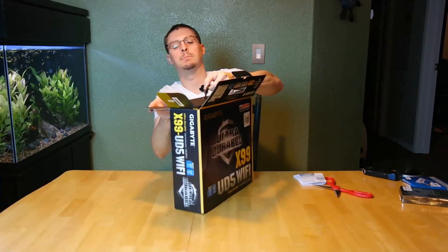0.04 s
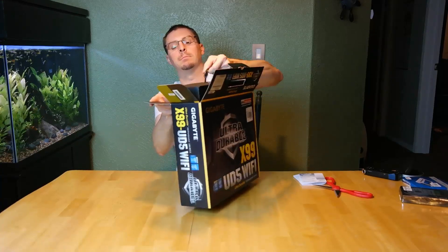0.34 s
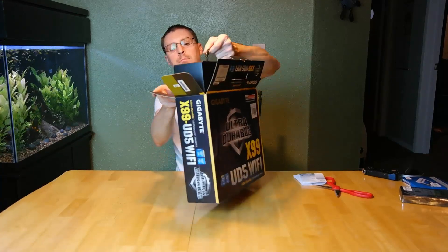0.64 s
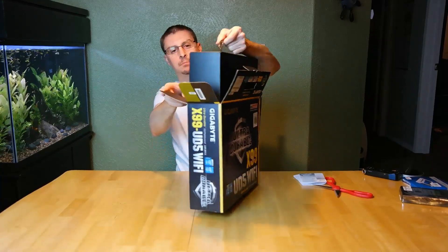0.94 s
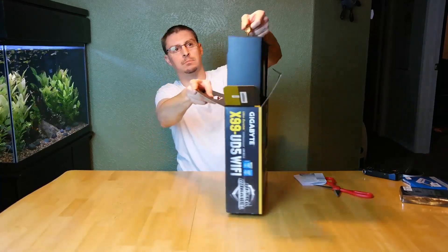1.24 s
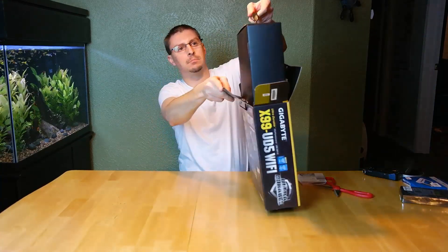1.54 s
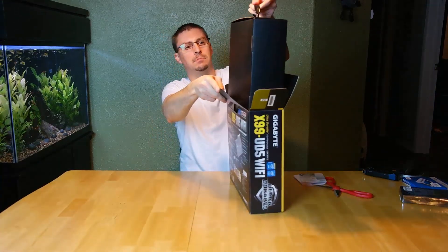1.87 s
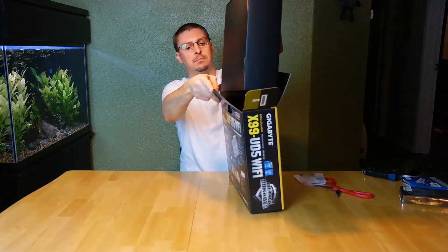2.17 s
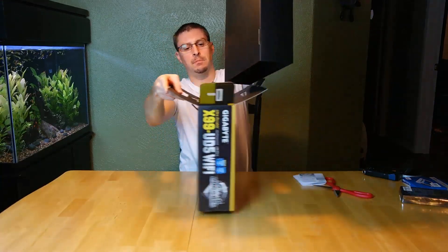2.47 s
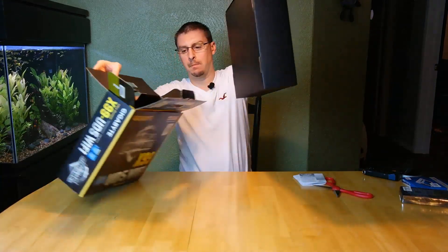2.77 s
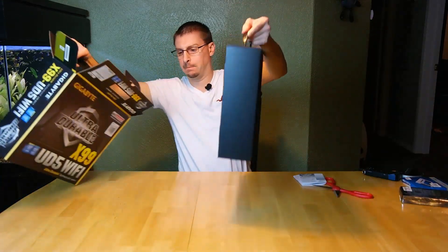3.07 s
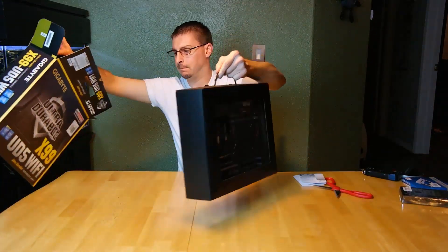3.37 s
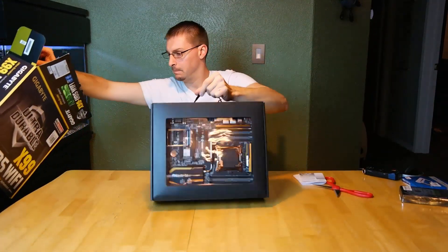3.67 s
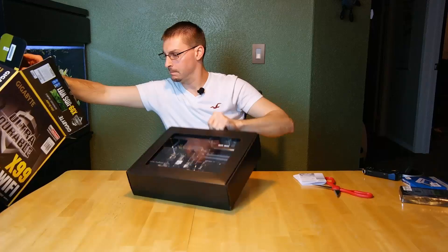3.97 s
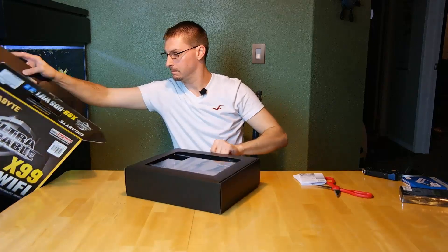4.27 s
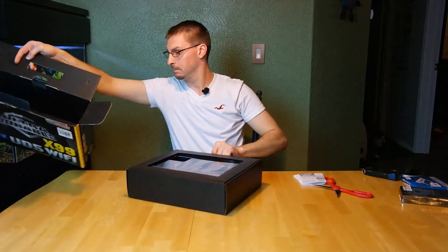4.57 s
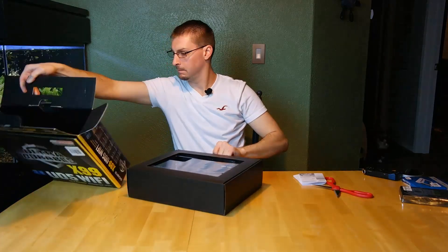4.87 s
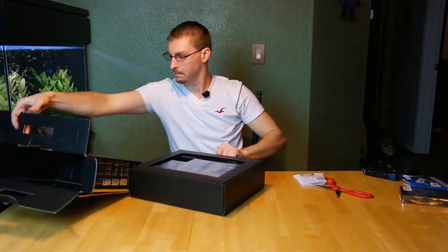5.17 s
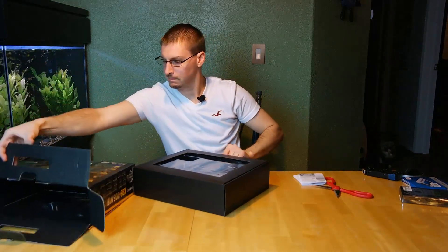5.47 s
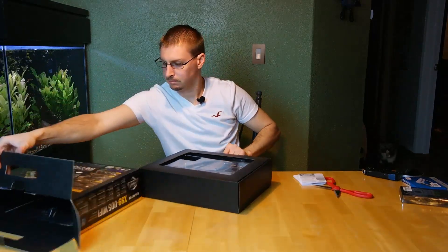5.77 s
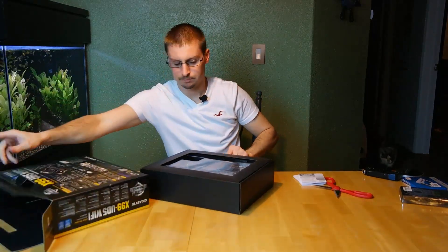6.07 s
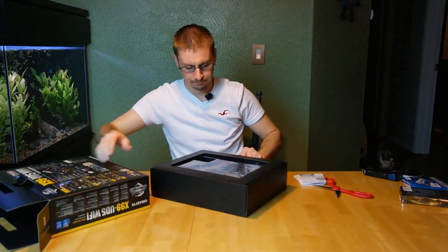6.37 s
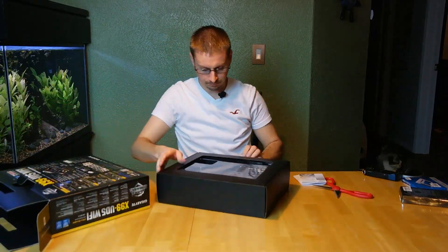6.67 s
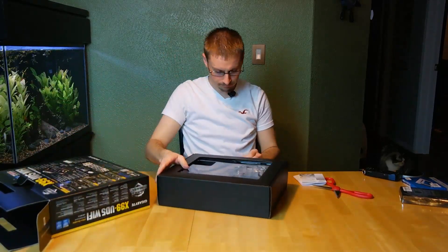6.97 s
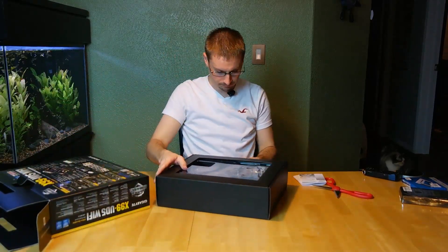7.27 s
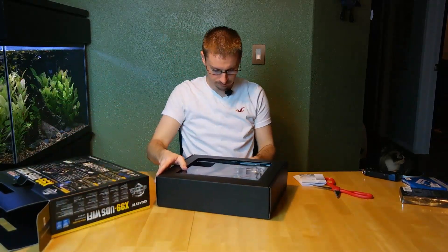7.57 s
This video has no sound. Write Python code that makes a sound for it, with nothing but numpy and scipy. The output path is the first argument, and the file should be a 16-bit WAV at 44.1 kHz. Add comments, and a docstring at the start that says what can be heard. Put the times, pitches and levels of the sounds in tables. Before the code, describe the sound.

Cardboard slides against cardboard with a dry, uneven hiss and a few hollow knocks as an inner box is pulled from its sleeve. A loud thud follows as the box meets a wooden tabletop, which booms briefly. Lighter knocks and scrapes come as the sleeve is dropped and pushed aside, ending with soft finger taps on the box. The sounds are fairly close, in a small room with a low pump hum.

```python
"""Unsleeving a heavy box.

In a small room, a heavy inner box rubs out of its cardboard sleeve in three pulls and is set down
on a wooden table, which booms. The empty sleeve is dropped beside it and pushed away; hands then
shift and tap the box. Slipping fibres hiss; blows ring the hollow, panels and paper surface.
An aquarium pump hums under the room's steady wash."""
import sys
import numpy as np
from scipy import signal
from scipy.io import wavfile

SR = 44100
rng = np.random.default_rng(int(sys.argv[2]) if len(sys.argv) > 2 else 0)


def to_wav(sig):
    """Store sig (one row per channel, or 1-D mono) as 16-bit WAV at the path in sys.argv[1].

    Samples outside -1..1 are clipped; the rate is SR.
    """
    pcm = np.clip(np.atleast_2d(sig), -1, 1) * 32767
    pcm = np.round(pcm).astype(np.int16)
    wavfile.write(sys.argv[1], SR, pcm.T)  # frames by channels


N = 344685


def amp(db):
    """Decibels to gain."""
    return 10 ** (np.asarray(db) / 20)


def unit(x):
    """Scale to rms 1."""
    return x / np.sqrt(np.mean(x ** 2) + 1e-20)


def unit_attack(x):
    """Scale to rms 1 over the first 15 ms."""
    return x / np.sqrt(np.mean(x[:660] ** 2) + 1e-20)


def log_interp(points, hz):
    """Interpolate on a log-frequency axis."""
    knots_hz, values = np.transpose(points)
    return np.interp(np.log(hz + 1), np.log(knots_hz + 1), values)


def add(mix, start_s, sound):
    """Mix a sound in at start_s."""
    part = mix[max(round(start_s * SR), 0):][:len(sound)]
    part += sound[:len(part)]


def colour(x, spectrum, size=4096):
    """Minimum-phase filter with the given spectrum."""
    bins_hz = abs(np.fft.fftfreq(size, 1 / SR))
    log_gain = np.log(amp(log_interp(spectrum, bins_hz)))
    response = np.exp(np.conj(signal.hilbert(log_gain)))
    impulse = np.fft.ifft(response).real[:size // 2]
    return signal.fftconvolve(x, impulse)[:len(x)]


def decay(t, t60_s):
    """Gain falling 60 dB in t60_s."""
    return np.exp(-np.log(1000) * t / t60_s)


def drift(count, hz):
    """Random curve of rms 1, hz knots a second."""
    knots = rng.standard_normal(int(N / SR * hz) + 3)
    return unit(np.interp(np.arange(count) / SR * hz, np.arange(len(knots)), knots))


def swell(peak_s, rise_s, fall_s, depth_db=16.5):
    """Start time and gain of a stroke: up depth_db over rise_s, down as much over fall_s."""
    t = np.arange(-1.5 * rise_s, 1.5 * fall_s, 1 / SR)
    return peak_s + t[0], amp(-depth_db * np.maximum(-t / rise_s, t / fall_s))


def mode(t, hz, t60_s, rise_s):
    """Damped resonance with a gradual onset."""
    return np.sin(2 * np.pi * hz * t) * decay(t, t60_s) * (1 - np.exp(-t / rise_s))


def dense_modes(t, t60_s, spectrum, contact):
    """Contact pulse, then many close modes decaying together."""
    ring = unit(rng.standard_normal(len(t))) * decay(t, t60_s)
    ring[0] += contact * np.linalg.norm(ring)
    return unit_attack(colour(ring, spectrum))


# Room noise spectrum (frequency [Hz], relative level [dB])
WASH_SPECTRUM = [(15, 4.5), (38, 15), (80, 0), (130, 7.5), (215, 8), (290, -1), (420, 1.5), (780, 3.5),
                 (1100, 1.5), (2000, -7.5), (3200, -15), (8500, -20), (11000, -28), (15500, -42)]

def room_wash(level_db=-48):
    """Steady, mostly low room noise."""
    return amp(level_db) * unit(colour(rng.standard_normal(N), WASH_SPECTRUM, size=16384))


# Pump partials (frequency [Hz], rms level [dB])
PUMP_PARTIALS = [(59.2, -56.5), (118.4, -58), (565.2, -62.5), (769.8, -60.5)]

def pump_hum(waver_db=1.0, waver_rad=0.58):
    """The aquarium pump hums; each partial wavers in level and phase."""
    out, t = np.zeros(N), np.arange(N) / SR
    for hz, db in PUMP_PARTIALS:
        gain = np.sqrt(2) * amp(db + waver_db * drift(N, hz=7))
        out += gain * np.sin(2 * np.pi * hz * t + waver_rad * drift(N, hz=3.14))
    return out


# Rubbed panel spectrum (frequency [Hz], relative level [dB])
MURMUR_SPECTRUM = [(20, -19), (42, 6.5), (90, -7), (170, -6), (300, -12.5), (450, 1), (750, 5.5),
                   (1100, 0.5), (1800, 1), (2800, -12.5), (5000, -44), (12000, -78)]

def rub(hiss_gain, murmur_gain, surface, slips_per_s, uneven_db, spread_db=2.0):
    """Paper fibres catch and slip; the same slips hiss at the surface and shake the panels."""
    count = len(hiss_gain)
    sizes = amp(spread_db * np.minimum(rng.exponential(1, count), 5))
    slips = sizes * rng.choice([-1, 1], count) * (rng.random(count) < slips_per_s / SR)
    slips *= amp(uneven_db * drift(count, hz=70.03))
    return hiss_gain * unit(colour(slips, surface)) + murmur_gain * unit(colour(slips, MURMUR_SPECTRUM))


# Sliding card spectrum (frequency [Hz], relative level [dB])
SLIDE_SPECTRUM = [(900, -16), (2200, 2), (3000, -3.5), (4200, -5), (5500, -0.5), (7100, 0), (9000, -4),
                  (11000, -13), (12300, -15.5), (15500, -20.5)]
# Friction curves, one per pull (time [s], level [dB])
PULLS = [
    [(0.0, -71), (0.132, -53), (0.58, -52.5), (0.61, -49.5), (0.952, -48.5), (0.964, -54.5), (1.152, -46),
     (1.378, -51.5), (1.432, -47), (1.454, -78), (1.5, -57)],
    [(1.587, -33.5), (1.603, -50), (1.637, -40.5), (1.707, -61), (1.761, -48.5), (1.895, -47.5),
     (1.913, -55.5), (1.973, -49.5), (2.111, -47), (2.177, -50), (2.28, -89)],
    [(2.418, -68), (2.434, -50), (2.446, -48), (2.488, -57), (2.496, -51.5), (2.586, -52.5), (2.598, -48),
     (2.694, -48), (2.702, -44), (2.716, -57), (2.8, -67)],
]

def sleeve_slide(hiss_offset_db=1.0, nominal_pull_db=-50.5, nominal_murmur_db=-48, murmur_slope=0.54):
    """The box slides out of the sleeve; one friction level drives hiss and murmur."""
    out = np.zeros(N)
    for pull in PULLS:
        times_s, levels_db = np.transpose(pull)
        friction_db = np.interp(np.arange(times_s[0], times_s[-1], 1 / SR), times_s, levels_db)
        hiss = amp(friction_db + hiss_offset_db)
        murmur = amp(nominal_murmur_db + murmur_slope * (friction_db - nominal_pull_db))
        add(out, times_s[0], rub(hiss, murmur, SLIDE_SPECTRUM, slips_per_s=12000, uneven_db=1.22))
    return out


# Struck box spectra: hollow, panel, paper surface (frequency [Hz], relative level [dB])
HOLLOW_SPECTRUM = [(25, -15), (55, -7), (95, -2), (140, 0.5), (340, 6), (480, -11.5), (800, -27),
                   (3000, -60)]
PANEL_SPECTRUM = [(150, -15.5), (380, -3.5), (650, 1), (1050, 0), (1400, -5), (1900, -11), (2600, -19),
                  (8000, -75)]
TICK_SPECTRUM = [(500, -59), (1500, 4), (2200, 11), (3200, 8.5), (4500, 5.5), (7500, -0.5), (10000, -6.5),
                 (15500, -14)]

def blow(db, hardness, thump_hz, knock_hz, tick_db, surface=TICK_SPECTRUM, ring_scale=1.0):
    """A blow rings hollow, panel and surface; a harder one favours the panel and dies sooner."""
    t = np.arange(SR // 3) / SR
    soft_s, hard_s = 0.12, 0.027
    base_t60_s = ring_scale * soft_s * (hard_s / soft_s) ** hardness
    thump = unit_attack(mode(t, thump_hz, 2.03 * base_t60_s, rise_s=0.00026))
    hollow = thump + 0.84 * dense_modes(t, 3.0 * base_t60_s, HOLLOW_SPECTRUM, contact=0.28)
    upper_bend = mode(t, knock_hz, 0.7 * base_t60_s, rise_s=0.0011)
    lower_bend = amp(-1) * mode(t, 0.71 * knock_hz, 0.65 * base_t60_s, rise_s=0.0011)
    panel = unit_attack(upper_bend - lower_bend)
    panel += 0.71 * dense_modes(t, 1.32 * base_t60_s, PANEL_SPECTRUM, contact=0.18)
    tick = dense_modes(t, 1.06 * base_t60_s, surface, contact=0.28)
    panel_gain = amp(31.5 * (hardness - 0.44))  # equals the hollow at hardness 0.44
    body = (unit_attack(hollow) + panel_gain * unit_attack(panel)) / np.hypot(1, panel_gain)
    return amp(db) * (body + amp(tick_db) * tick)


# Soft blows (time [s], level [dB], hollow thump [Hz])
BUMPS = [(.954, -42, 185), (1.434, -37.5, 310), (1.791, -41.5, 137), (2.161, -42, 179), (2.388, -42, 178),
         (4.304, -36, 217), (4.491, -41.5, 271), (5.073, -37.5, 180), (5.313, -39.5, 169)]

def sleeve_bumps():
    """The sleeve rocks on its soft side."""
    out = np.zeros(N)
    for time_s, db, thump_hz in BUMPS:
        add(out, time_s, blow(db, hardness=0.32, thump_hz=thump_hz, knock_hz=584, tick_db=-21))
    return out


# Weight landing on the table (time [s], gain [dB])
TABLE_LOADS = [(.956, -40), (1.79, -44.5), (3.6551, -16), (3.756, -43), (5.184, -39)]
# Tabletop modes (frequency [Hz], relative level [dB], t60 [s], rise [s])
TABLE_MODES = [(40, -4, 0.68, 0.011), (52.3, -7, 0.25, 0.0029), (138, 8, 0.36, 0.042),
               (150, -10, 0.35, 0.04), (218.5, -11.5, 0.3, 0.014), (333, -12, 0.29, 0.0089),
               (484, -12, 0.35, 0.007), (585, -16, 0.36, .008), (683, -7.5, 0.18, .004),
               (883, -18, 0.18, 0.0049), (1080, -17, 0.21, .006)]

def table_boom():
    """The tabletop booms under a box's weight."""
    out, t = np.zeros(N), np.arange(SR) / SR
    ring = sum(amp(db) * mode(t, hz, t60_s, rise_s) for hz, db, t60_s, rise_s in TABLE_MODES)
    for time_s, db in TABLE_LOADS:
        add(out, time_s, amp(db) * ring)
    return out


# Blows (time [s], level [dB], hardness [0-1], hollow thump [Hz], panel knock [Hz], tick [dB re level])
KNOCKS = [(1.057, -42.5, .75, 142, 600, -16), (1.5873, -25, .7, 366, 458, -14),
          (1.892, -37, 0.55, 145, 580, -17), (2.378, -45, .75, 298, 664, -11),
          (2.699, -33, 0.94, 200, 1680, -13.5), (3.6319, -22.5, 0.47, 224, 795, -23),
          (3.6537, -10.5, 0.9, 138, 927, -22.5), (3.6676, -27, 0.34, 313, 510, -13),
          (3.754, -29, 0.53, 216, 596, -24), (4.9464, -22, 0.25, 221, 600, -21.5),
          (4.9753, -21.5, 0.71, 323, 717, -15.5), (4.9875, -26.5, 0.44, 276, 1300, -27),
          (5.1787, -25, 0.43, 151, 715, -18.5), (5.298, -43.5, 0.7, 180, 1390, -7),
          (5.681, -37.5, 0.48, 214, 750, -20), (6.776, -36, 0.86, 340, 455, -25)]

def box_knocks():
    """An edge, a corner or the heel of a hand strikes."""
    out = np.zeros(N)
    for time_s, db, hardness, thump_hz, knock_hz, tick_db in KNOCKS:
        add(out, time_s, blow(db, hardness, thump_hz, knock_hz, tick_db))
    return out


def rubbed_resonance(hz, width_hz):
    """Friction noise drives a resonance that follows the curve hz."""
    pole = np.exp(-np.pi * width_hz / SR)
    friction = rng.standard_normal(len(hz)) + 1j * rng.standard_normal(len(hz))
    baseband = signal.lfilter([1], np.poly([pole, pole]), friction)
    carrier = np.exp(2j * np.pi * np.cumsum(hz) / SR)
    return unit((baseband * carrier).real)


# Lip catching on the box edge (peak [s], rise [s], fall [s], level [dB])
LIP_CATCHES = [(2.455, 0.031, 0.054, -45), (2.555, 0.052, 0.043, -47), (2.62, 0.066, 0.13, -38.5)]

def sleeve_lip(first_peak_hz=1007, sag_hz_per_s=1400, judder_hz=222.0, judder_db=-4.5):
    """Friction shakes the sleeve and sings in a panel resonance that sinks as the box comes free."""
    out = np.zeros(N)
    first_peak_s = LIP_CATCHES[0][0]
    for peak_s, rise_s, fall_s, db in LIP_CATCHES:
        start_s, gain = swell(peak_s, rise_s, fall_s)
        elapsed_s = start_s - first_peak_s + np.arange(len(gain)) / SR
        squeak = rubbed_resonance(first_peak_hz - sag_hz_per_s * elapsed_s, width_hz=350)
        judder = amp(judder_db) * rubbed_resonance(np.full(len(gain), judder_hz), width_hz=520)
        add(out, start_s, amp(db) * gain * (squeak + judder))
    return out


# Scuffed card spectrum (frequency [Hz], relative level [dB])
SCUFF_SPECTRUM = [(900, -1), (2200, 12), (3600, 5), (6000, 9.5), (9500, 2), (11500, -7), (15500, -8)]
# Strokes (peak [s], rise [s], fall [s], hiss [dB], panel murmur [dB])
SCUFFS = [(4.04, 0.31, 0.36, -60.5, -50), (4.445, .018, 0.011, -36, -62), (4.47, .07, 0.4, -57, -55),
          (4.981, 0.028, 0.1, -45, -33.5), (5.48, 0.11, 0.1, -54.5, -46.5), (5.95, .35, 0.24, -61, -66),
          (6.13, 0.03, 0.02, -51.5, -44), (6.92, .15, 0.099, -61, -77)]

def box_scuffs():
    """The boxes rub each other and the table in short strokes."""
    out = np.zeros(N)
    for peak_s, rise_s, fall_s, hiss_db, murmur_db in SCUFFS:
        start_s, gain = swell(peak_s, rise_s, fall_s)
        hiss, murmur = gain * amp(hiss_db), gain * amp(murmur_db)
        add(out, start_s, rub(hiss, murmur, SCUFF_SPECTRUM, slips_per_s=8500, uneven_db=2.0))
    return out


def box_turn(hiss_db=-59.5, murmur_re_hiss_db=-14):
    """The box turns on smooth varnish: a fine hiss that hardly shakes the panels."""
    out = np.zeros(N)
    start_s, gain = swell(peak_s=6.55, rise_s=0.49, fall_s=0.61)
    glide = rub(gain, gain * amp(murmur_re_hiss_db), SLIDE_SPECTRUM, slips_per_s=12000, uneven_db=1.6)
    add(out, start_s, amp(hiss_db) * glide)
    return out


# Flap modes (frequency [Hz], relative level [dB], t60 [s])
FLAP_MODES = [(1150, 2, 0.012), (1780, 4, 0.009), (2320, 0.5, 0.018)]

def flap_creak(start_s=6.107, length_s=0.036, level_db=-47, median_slips_per_s=370):
    """Uneven slips in the fold ring the flap."""
    out, t = np.zeros(N), np.arange(0, length_s, 1 / SR)
    slips_per_s = median_slips_per_s * np.exp(0.9 * drift(len(t), hz=405.4))
    slips = np.diff(np.floor(np.cumsum(slips_per_s) / SR), prepend=0)
    ring = sum(amp(db) * mode(t, hz, t60_s, rise_s=0.00023) for hz, db, t60_s in FLAP_MODES)
    creak = unit(signal.fftconvolve(slips, ring)[:len(t)])
    arch = np.sin(np.pi * t / length_s)
    add(out, start_s, amp(level_db) * arch * creak)
    return out


# Finger-on-card spectrum (frequency [Hz], relative level [dB])
FINGER_SPECTRUM = [(500, -22), (1200, 0), (1900, 2), (2600, -2), (4000, -12), (8000, -25), (15500, -48)]
# Taps (time [s], level [dB], hardness [0-1], panel knock [Hz])
TAPS = [(6.683, -49, 0.6, 1700), (6.978, -42, .35, 750), (7.066, -37, 0.32, 1270), (7.356, -48, 0.34, 1300),
        (7.439, -39.5, 0.26, 920), (7.5326, -34.5, 0.52, 1140), (7.57, -45.5, .65, 616),
        (7.799, -40.5, 0.84, 860)]

def finger_taps(thump_hz=244):
    """Fingers tap the lid and damp its ring."""
    out = np.zeros(N)
    for time_s, db, hardness, knock_hz in TAPS:
        tap = blow(db, hardness, thump_hz, knock_hz, tick_db=-10, surface=FINGER_SPECTRUM, ring_scale=0.39)
        add(out, time_s, tap)
    return out


# Finger strokes (peak [s], rise [s], fall [s], hiss [dB])
DRAGS = [(7.05, .07, 0.037, -47.5), (7.45, 0.22, 0.14, -51), (7.515, .04, 0.072, -50.5),
         (7.644, .03, 0.14, -51)]

def finger_drags(murmur_re_hiss_db=2.5):
    """Fingers drag over the lid in sparser, coarser slips."""
    out = np.zeros(N)
    for peak_s, rise_s, fall_s, hiss_db in DRAGS:
        start_s, gain = swell(peak_s, rise_s, fall_s)
        murmur = gain * amp(murmur_re_hiss_db)
        drag = rub(gain, murmur, FINGER_SPECTRUM, slips_per_s=2500, uneven_db=3.0, spread_db=3.5)
        add(out, start_s, amp(hiss_db) * drag)
    return out


# Room decay (frequency [Hz], t60 [s])
ROOM_T60 = [(100, 0.82), (400, 0.25), (1200, 0.39), (4000, 0.41), (12000, 0.21)]

def reverb(x, predelay_s=0.0049, echoes_per_s=3000, tails=3, crossfade_hz=1.0):
    """Sparse reflections decay band by band; crossfaded tails vary the paths."""
    out = np.zeros(N)
    for k in range(tails):
        echoes = rng.choice([-1., 1.], SR) * (rng.random(SR) < echoes_per_s / SR)
        echoes *= np.arange(SR) > predelay_s * SR
        hz, t, bands = signal.stft(echoes, SR, nperseg=256)
        tail = signal.istft(bands * decay(t, log_interp(ROOM_T60, hz)[:, None]), SR)[1]
        phase = 2 * np.pi * crossfade_hz * np.arange(N) / SR + np.pi * k / tails
        share = np.sqrt(2 / tails) * np.cos(phase)
        out += signal.fftconvolve(x * share, tail / np.linalg.norm(tail))[:N]
    return out


def scene(reverb_db=-10):
    """Mono mix: cardboard with its reflections, table and background."""
    background = room_wash() + pump_hum()
    cardboard = sleeve_slide() + sleeve_bumps() + box_knocks() + sleeve_lip() + box_scuffs()
    cardboard += box_turn() + flap_creak() + finger_taps() + finger_drags()
    return (background + cardboard + amp(reverb_db) * reverb(cardboard) + table_boom())[None]


def record(dry, cutoff_hz=15850):
    """Steep low-pass on the top treble."""
    lowpass = signal.firwin(511, cutoff_hz, window=("kaiser", 9), fs=SR)
    return signal.oaconvolve(dry, lowpass[None], "same")


dry = scene()
out = record(dry)
to_wav(out)
```